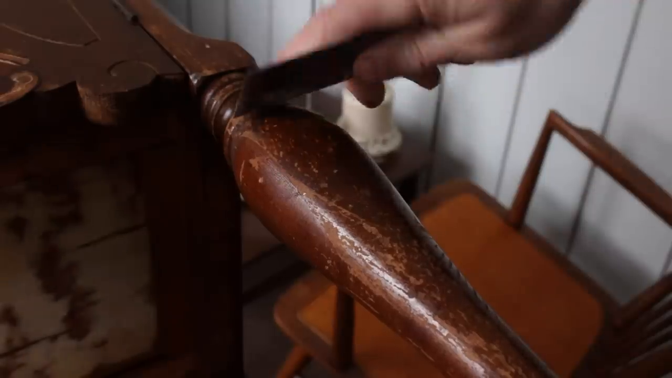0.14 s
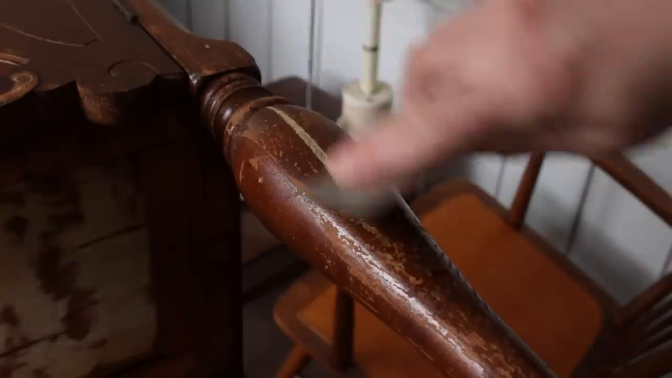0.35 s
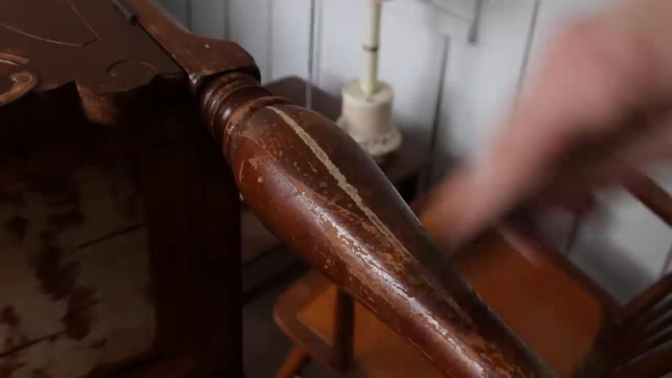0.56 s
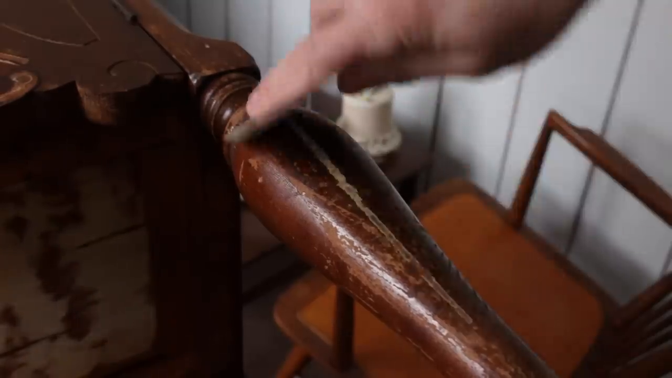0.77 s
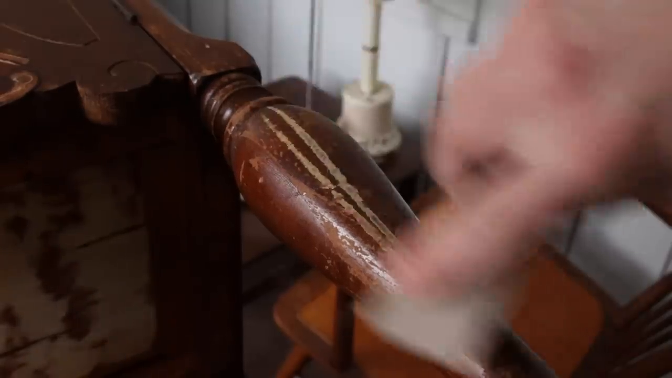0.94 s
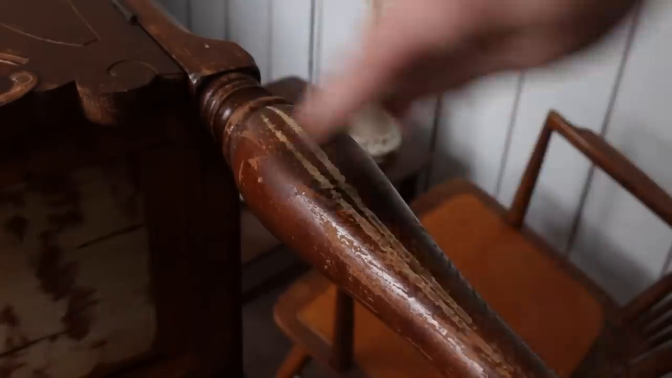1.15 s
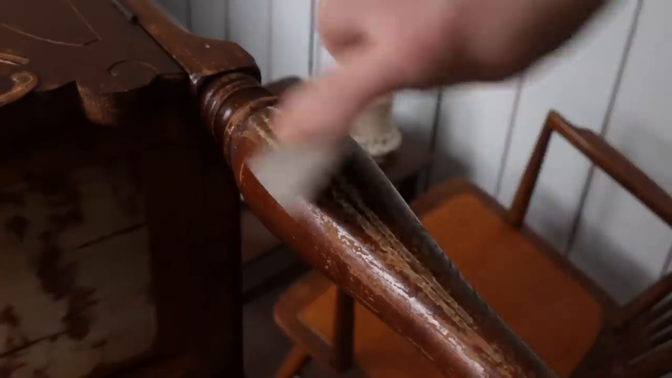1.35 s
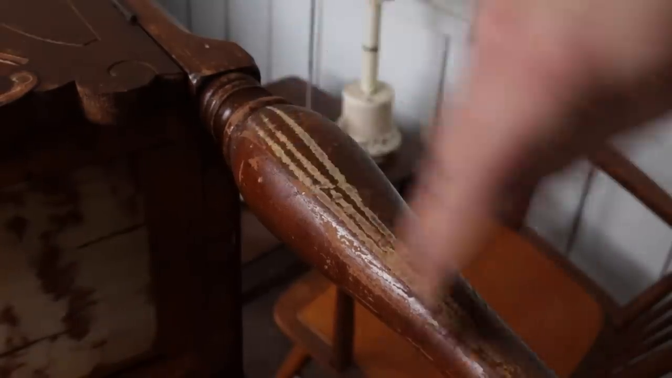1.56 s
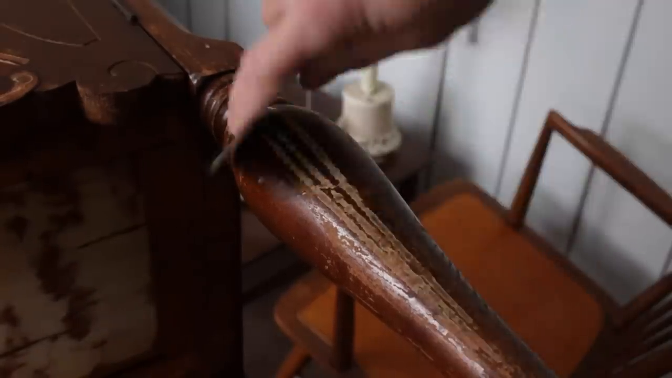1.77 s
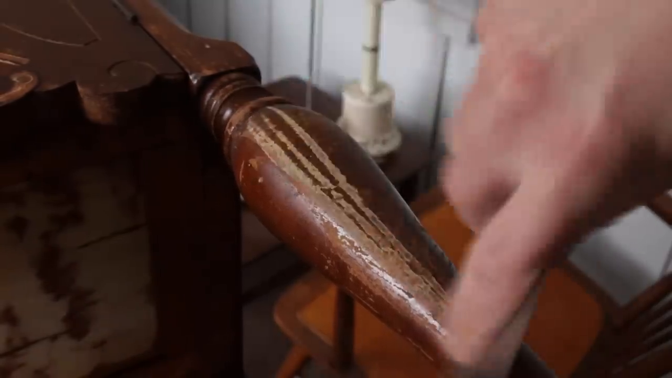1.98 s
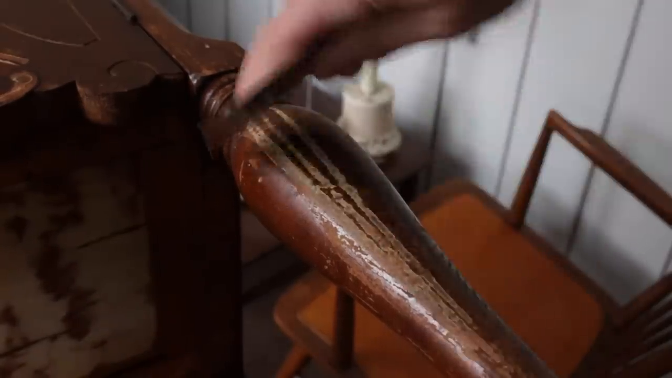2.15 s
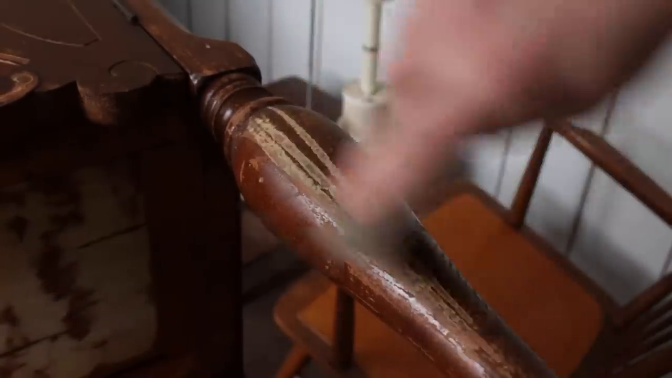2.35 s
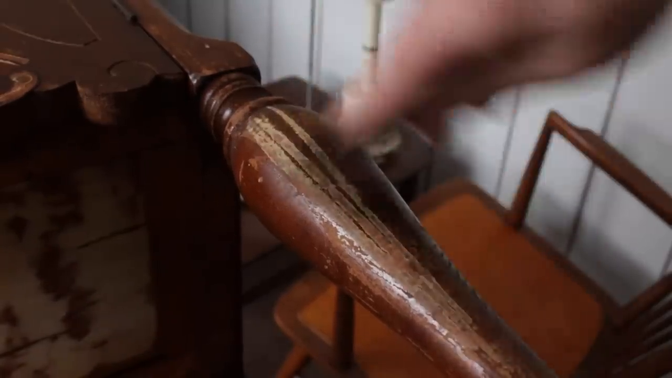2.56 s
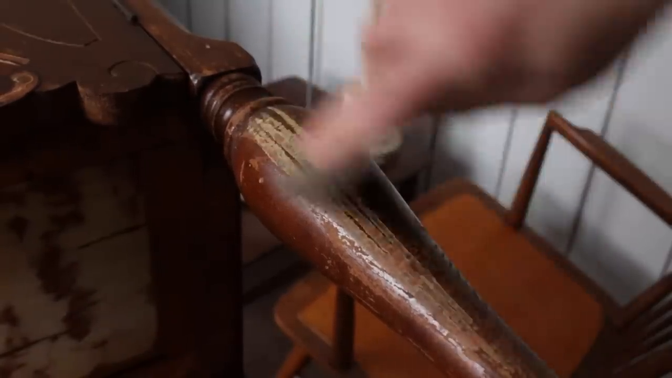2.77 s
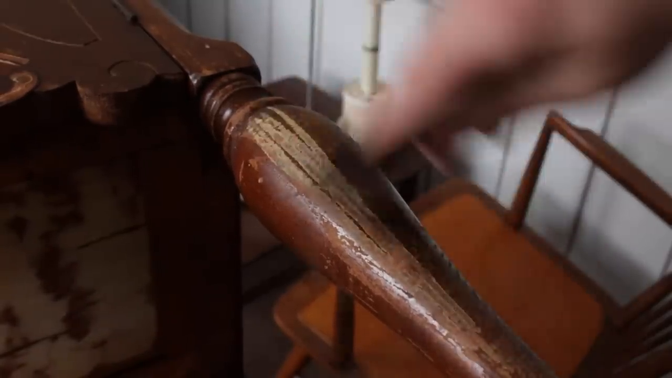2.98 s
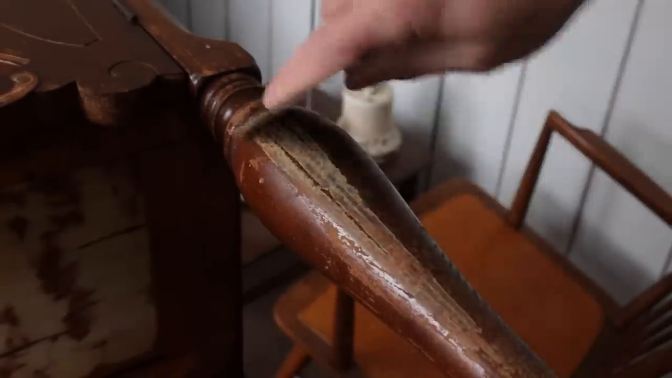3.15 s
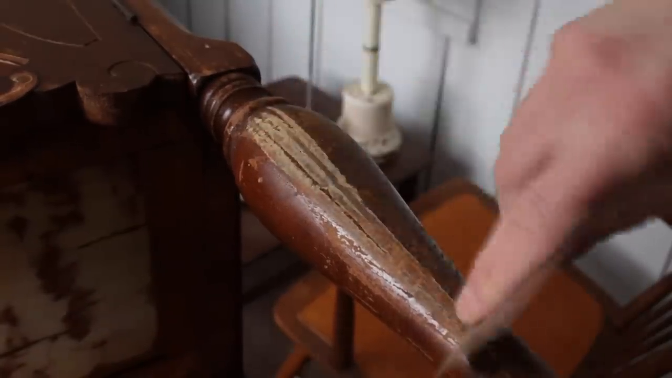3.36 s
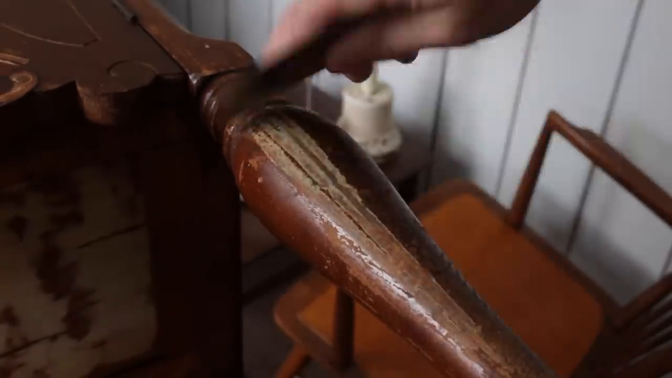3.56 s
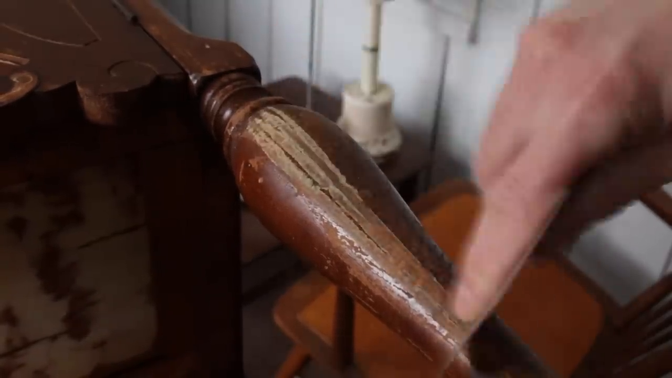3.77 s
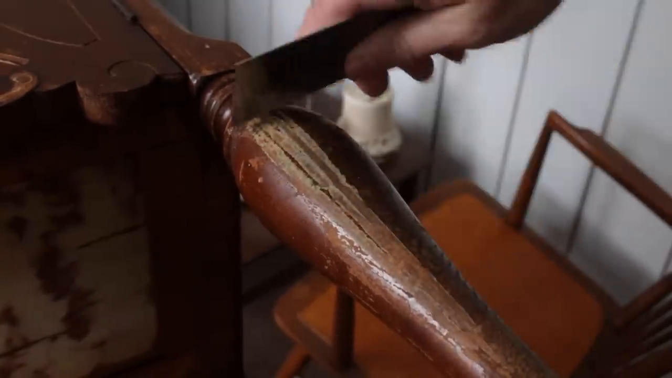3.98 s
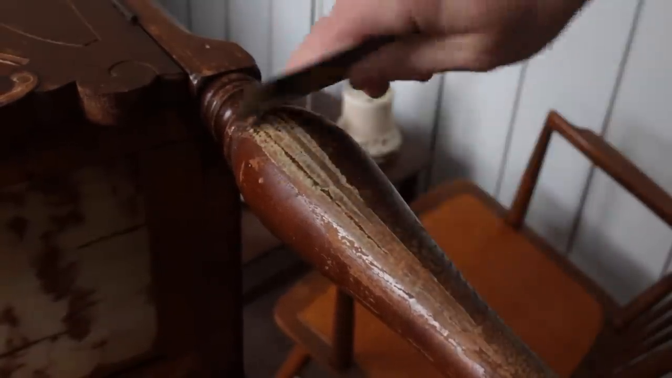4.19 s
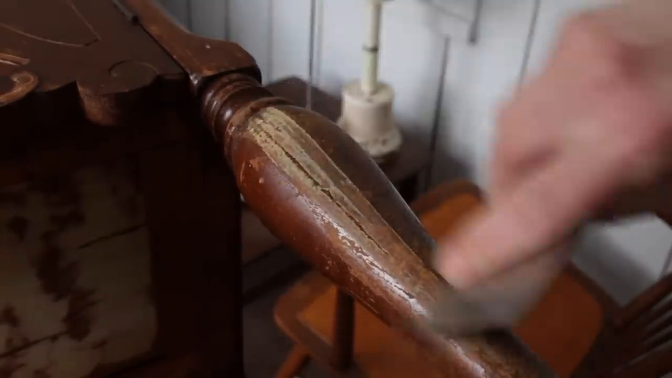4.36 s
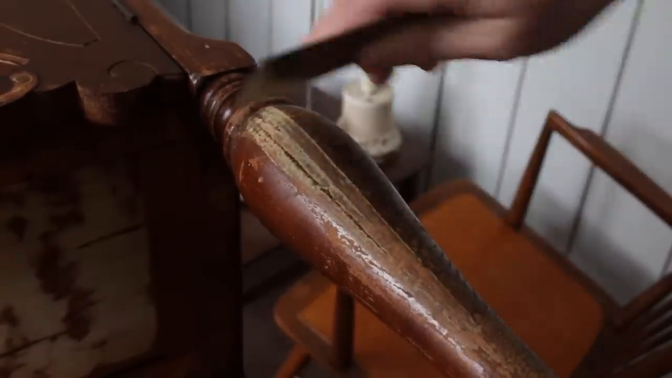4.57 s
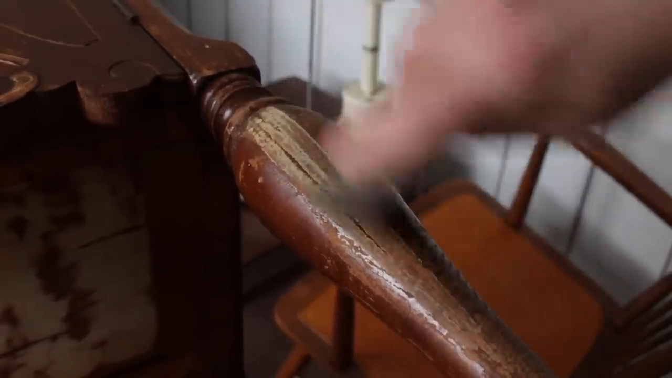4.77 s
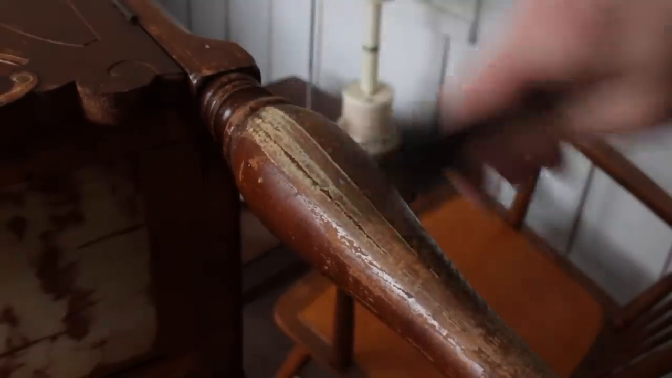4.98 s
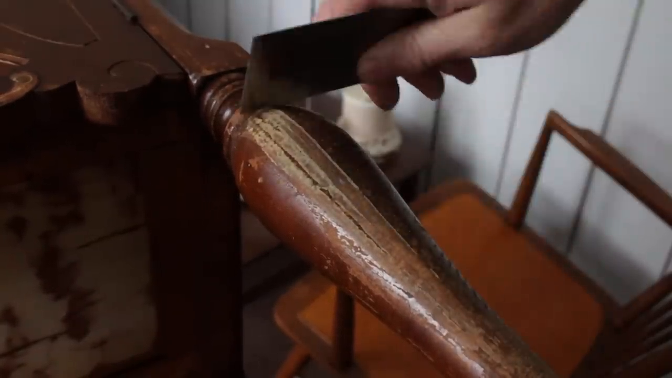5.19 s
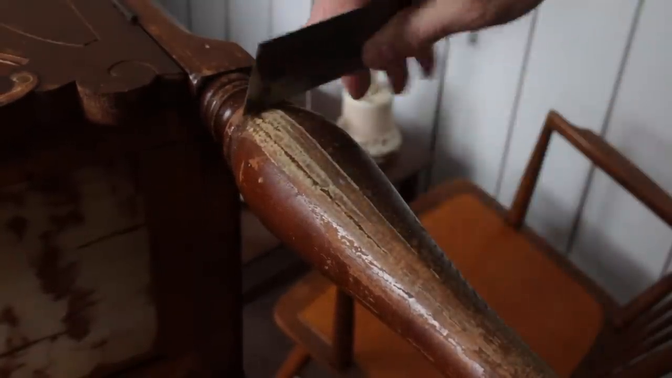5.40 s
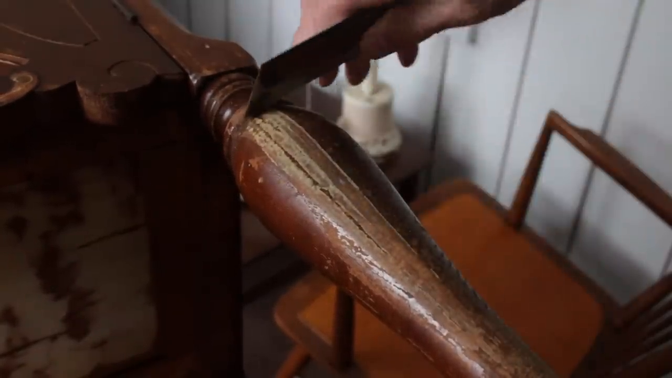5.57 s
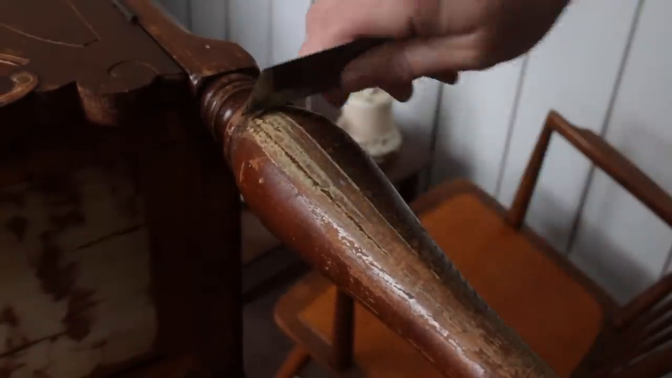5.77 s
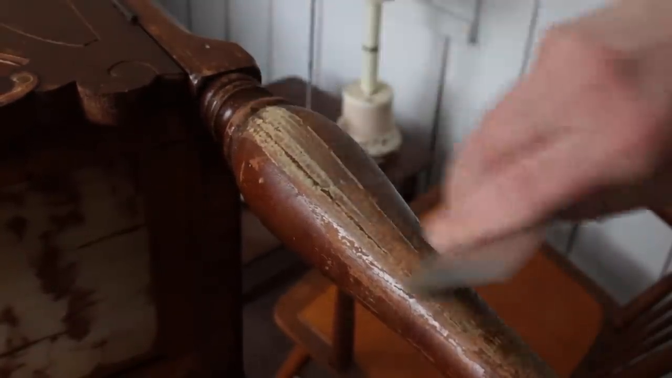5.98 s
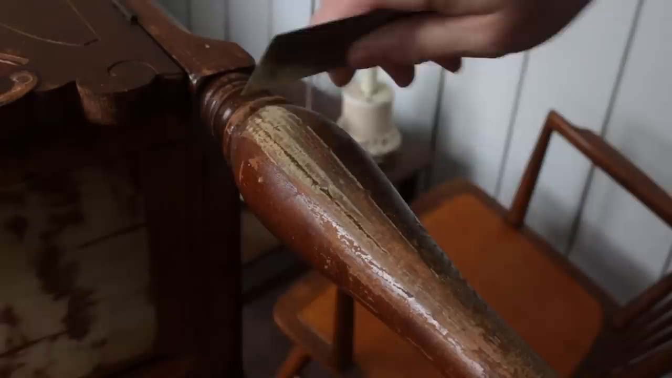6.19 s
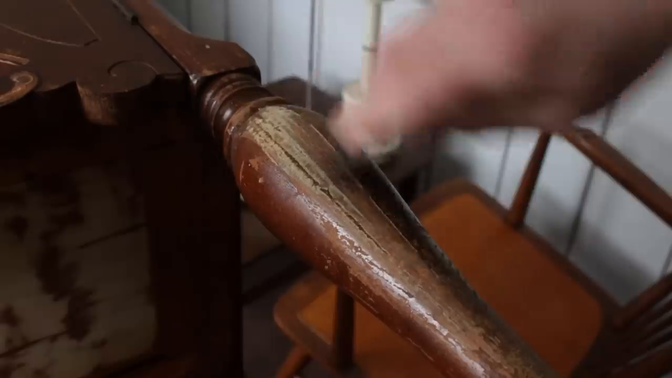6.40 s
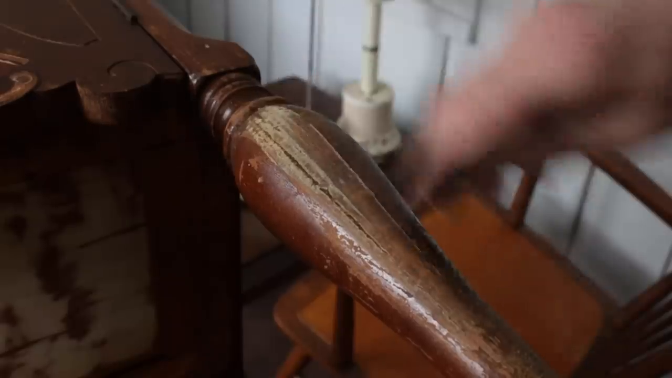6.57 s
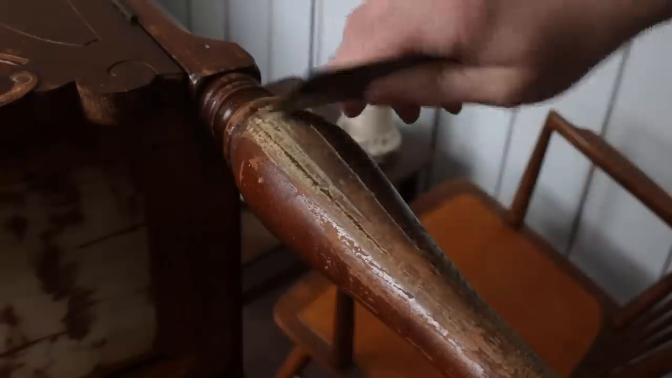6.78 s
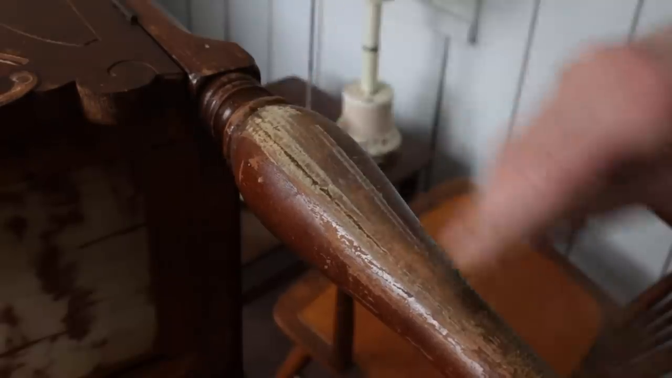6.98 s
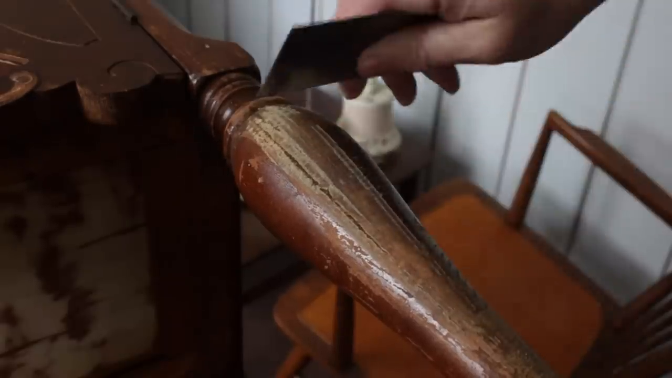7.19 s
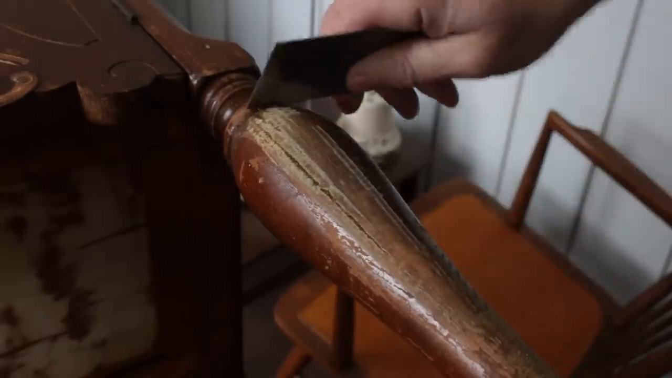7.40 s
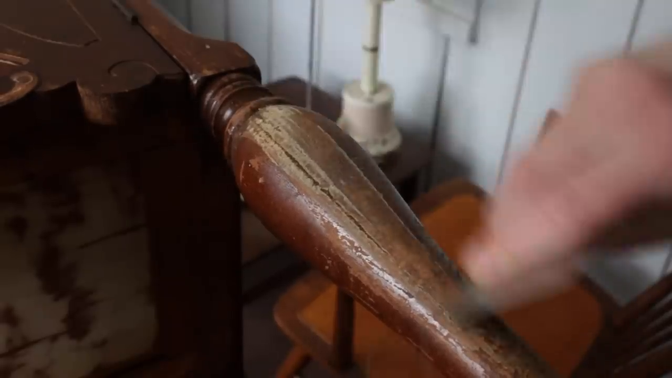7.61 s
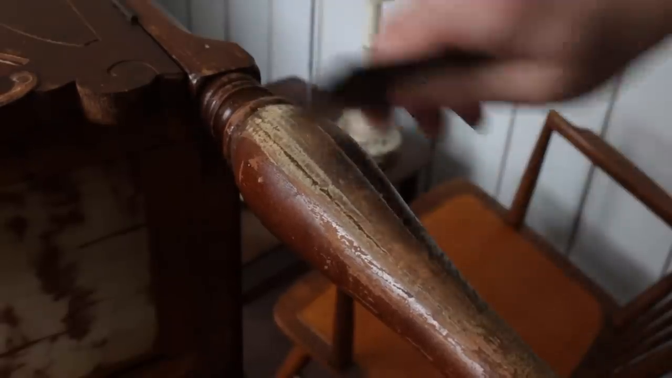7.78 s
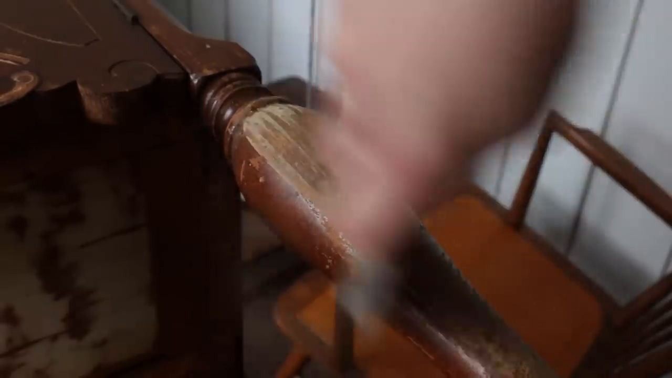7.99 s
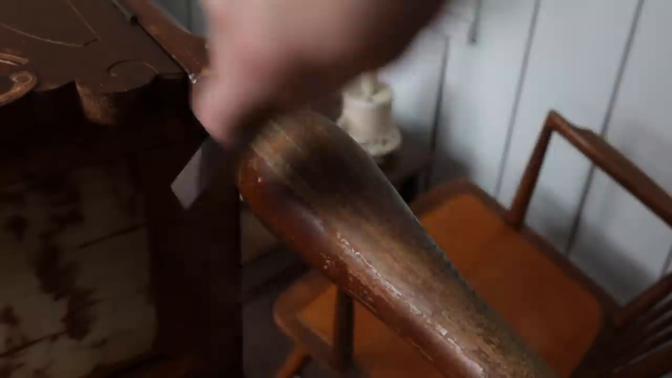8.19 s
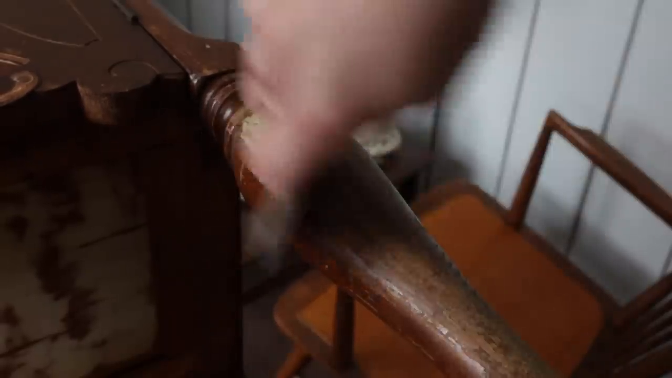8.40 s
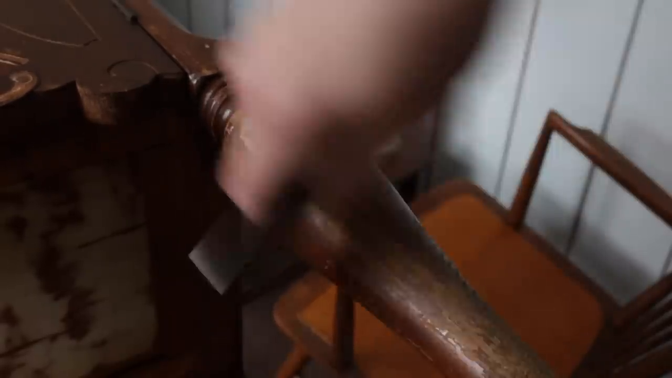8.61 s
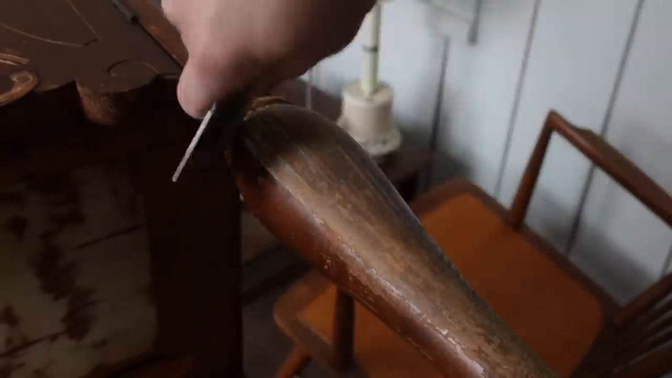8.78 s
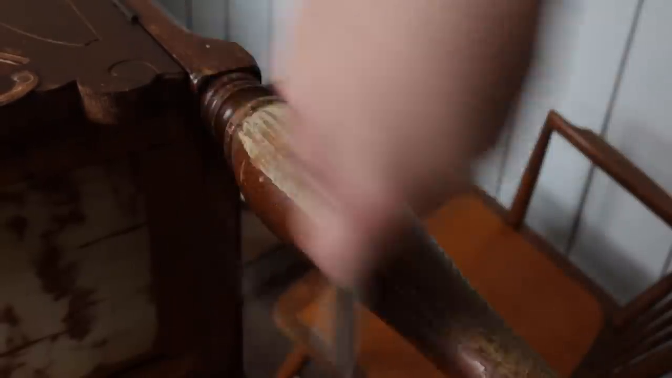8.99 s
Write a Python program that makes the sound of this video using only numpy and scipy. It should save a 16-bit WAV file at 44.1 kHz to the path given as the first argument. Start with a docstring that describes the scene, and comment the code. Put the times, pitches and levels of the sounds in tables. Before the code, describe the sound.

Close stereo microphones in a small, quiet workshop. A steel blade lands softly on a wooden furniture leg with a juddering skid, then pulls a gritty scrape. Tap and scrape repeat about twice a second, with sharper knocks and bright snaps of varnish. Dull furniture bumps join later; after a brief lull of faint grazes past five seconds, strokes resume and the last is still biting at the end.

```python
"""A small workshop, close pair of microphones, quiet air: a steel card scraper on a turned wooden furniture leg.
At once the blade is set down with a tap (a blow ringing leg and steel) and skids, a dying judder; a light graze follows.
Then stroke after stroke, all but one tapped in: fractures and friction tear brittle varnish, shaking leg and bent blade,
whose resonances shift with the grip; flakes snap off. Past 4 s dull bumps of the furniture join in; a pause past 5 s
holds faint grazes. The last pull is still biting at the end. Dense echoes and a banded tail are the room."""
import sys
import numpy as np
from scipy import signal
from scipy.fft import rfft, irfft, next_fast_len
from scipy.io import wavfile

SR = 44100
rng = np.random.default_rng(int(sys.argv[2]) if len(sys.argv) > 2 else 0)


def pcm_store(signal):
    """Save signal as 16-bit PCM."""
    levels = np.round(np.clip(np.atleast_2d(signal), -1, 1) * 32767)
    wavfile.write(sys.argv[1], SR, levels.astype(np.int16).T)


N = 399105
TIME = np.arange(N) / SR

# Quiet air of the place, and the upper band limit of the recorder
AIR_DB = -81
EDGE_HZ = 15900
# Spectrum of the air: [f/Hz, relative level per Hz/dB]
AIR_SPECTRUM = [(30, -28), (60, -13.5), (130, -2), (280, 5), (550, 1), (800, -19), (1100, -1.5), (2000, -7),
                (4000, -6.5), (8000, -14.5), (11800, -16.5), (13000, -53)]
# Reverberation of the workshop: [f/Hz, t60/s]
ROOM_DECAY = [(150, 0.51), (700, 0.59), (1700, 0.35), (4000, 0.27), (8000, 0.24), (15000, 0.13)]
# Spread between the microphones: [f/Hz, side re middle level/dB]
STEREO_WIDTH = [(120, -22.5), (300, -17), (600, -14.5), (1100, -10.5), (2200, -8), (4000, -6.5),
                (8000, -3.5), (13000, -1.5)]
# Balance of the pair: [f/Hz, left re right level/dB]
STEREO_LEAN = [(200, -0.5), (600, 2), (1000, 1.2), (2000, 1), (4000, 0), (12000, -1)]

# Dull bumps of the furniture: [t/s, level/dB]
BUMP_TIMES = [(4.312, -37), (7.857, -31), (8.158, -34.5), (8.61, -33.5), (8.94, -31)]
# Spectrum of a bump: [f/Hz, relative level per Hz/dB]
THUD_SPECTRUM = [(60, -10), (130, 1), (220, 8.5), (330, 14), (550, 0), (1200, -31), (4000, -60)]
# The edge grazes the leg between strokes: [t/s, length/s, level before the part trims/dB]
GRAZE_TIMES = [(0.224, 0.1, -57.5), (5.425, 0.13, -73.5), (5.53, 0.27, -77), (5.676, 0.3, -72.5),
               (7.427, 0.13, -77)]
# Larger flakes of varnish snapping off: [t/s, level/dB]
FLAKE_TIMES = [(.266, -40), (.924, -19), (.937, -18), (.963, -18), (1.44, -15), (1.907, -28), (1.92, -16.5),
               (2.348, -34), (2.924, -24), (4.355, -14), (6.859, -29), (7.545, -27), (7.889, -34)]

# Blade set down: [t/s, leg level/dB, blade level/dB, tick level/dB, skid length/s, skid re blow before trim/dB,
# most excited leg f/Hz, most excited blade f/Hz]
TAP_TIMES = [(0.001, -28, -32.5, -44, 0.17, -5, 680, 1540),
             (0.8607, -19, -20.5, -18.5, 0.039, -13, 726, 1670),
             (1.3456, -21.5, -20.5, -21, 0.08, -10.5, 814, 1950),
             (1.8447, -19, -23.5, -25, 0.045, -7, 716, 1830),
             (2.29, -15.5, -18, -24.5, 0.044, -9, 746, 2240),
             (2.753, -26.5, -24, -30.5, 0.075, -5.5, 703, 2080),
             (3.169, -23.5, -24.5, -25, 0.047, 3.5, 730, 1630),
             (3.678, -20.5, -20, -23, 0.13, -4, 696, 2280),
             (4.073, -15.5, -19.5, -22, 0.086, -3, 640, 1520),
             (4.723, -19.5, -20, -21.5, 0.12, -12, 714, 1760),
             (5.2501, -20, -22, -28, 0.11, 2.5, 712, 2270),
             (6.351, -24, -19.5, -24.5, 0.036, -33, 733, 2330),
             (6.8045, -25, -25.5, -29, 0.038, -8, 715, 2300.0),
             (7.34, -21, -18.5, -32, 0.028, -2.5, 700, 1570),
             (8.3692, -16, -18, -19.5, 0.067, -9, 830, 2030),
             (8.835, -20, -26.5, -26.5, 0.055, -2.5, 776, 1790)]
# Spectrum of the tick of a tap and the snap of a flake: [f/Hz, relative level per Hz/dB]
TICK_SPECTRUM = [(1000, -35.5), (2600, 1), (3300, 2.5), (4300, -0.5), (5500, -5.5), (8000, -11),
                 (11000, -14), (15800, -27.5)]
# The blade's own bright ring on landing, soon damped by the wood: [f/Hz, width/Hz, relative level/dB]
PING_MODES = [(2249, 74, 6.5), (2760, 140, -4)]
# Resonances of the leg and its frame: [f/Hz, width/Hz, relative level/dB]
LEG_MODES = [(154, 63, -30.5), (236.5, 15, -16), (354.6, 38, -11), (465, 72, -9.5), (520, 93, -6.5),
             (619, 42.5, -5), (702, 76.4, -0.5), (743.5, 69, -5.5), (857, 54, 0), (884, 400, -10),
             (1114, 55, -9)]
# Resonances of the unbent blade touching the wood: [f/Hz, width/Hz, relative level/dB]
BLADE_MODES = [(1590, 94, 5.5), (1798, 78, -1), (1996, 87, 0), (2297, 132, 5.5), (2700, 320, -4.5)]

# One row a pull: [t/s, time to full bite/s, hold/s, rasp level at full bite/dB, sag over the hold/dB,
# leg re rasp level/dB, blade re rasp level/dB, fizz re rasp level/dB,
# bent blade f/Hz, eased blade f/Hz, rasp f at the bite/Hz, sizzle of the edge f/Hz]
STROKE_TIMES = [ (0.3, 0.14, 0.13, -43, -3.5, -8, -3.5, -2, 1705, 1614, 3840, 6650),
                (0.872, 0.095, .14, -42.5, -4.5, -9, -5.5, -1.5, 1790, 1600, 3800, 9640),
                (1.407, 0.057, .13, -44.5, -2, -10, -2.5, 0.5, 1980, 1625, 3760, 8500),
                (1.883, 0.079, .13, -42.5, -5.5, -7, -4, 2, 1730, 1670, 3690, 10100),
                (2.334, 0.09, .13, -43.5, -7, -5, -5.5, .5, 1760, 1600, 3830, 7300),
                (2.791, 0.069, .13, -41, -7, -8.5, -6, 0, 1630, 1640, 3280, 6560),
                (3.248, .085, .092, -44, -8, -4.5, -6.5, -0.5, 1800, 1650, 3370, 6800),
                (3.705, .11, 0.058, -45, -3.5, -9.5, -4, 0, 1760, 1640, 3400, 9900),
                (4.264, .076, .14, -47, -5.5, -4.5, -5.5, 0.5, 1760, 1640, 3570, 5400),
                (4.81, 0.078, .1, -43, -6, -9.5, -6, -1.5, 1680, 1684, 3570, 10200),
                (5.86, 0.14, 0.067, -42.5, -6.5, -7, -7, 1.5, 1735, 1840, 3450, 5470),
                (6.429, 0.083, 0.068, -41, -5, -10.5, -8.5, -1, 1830, 1676, 3460, 8800),
                (6.842, .11, 0.081, -41.5, -7, -10, -7.5, -0.5, 1850, 1640, 3450, 5300),
                (7.515, 0.13, 0.065, -43, -4, -8.5, -3, 1.5, 1960, 1950, 3820, 7700),
                (7.891, 0.11, 0.17, -44.5, -3.5, -8.5, -7, -2.5, 1650, 1680, 3770, 6600),
                (8.421, 0.082, 0.13, -43.5, -5, -7, -7.5, -4, 1780, 1640, 3640, 8900),
                (8.952, 0.13, .06, -42, -7, -9, -7.5, -4.5, 1820, 2080, 4020, 8800)]
# The edge skips (negative) or digs in (positive): [centre t/s, length/s, level/dB]
CATCH_TIMES = [(0.526, 0.11, -3), (0.59, 0.076, 7), (0.986, 0.078, -0.5), (1.521, 0.071, -5),
               (2.946, 0.067, -7.5), (2.994, 0.022, 5), (4.408, 0.075, 7.5), (5.968, 0.079, -3),
               (6.914, 0.035, -11.5), (7.613, 0.05, -9.5), (7.977, 0.073, -4), (8.013, 0.069, 6),
               (8.517, 0.024, 5)]
# Spectra of the rasp and of the fizz of the varnish: [f/Hz, relative level per Hz/dB]
RASP_SPECTRUM = [(1500, -47.5), (2200, 3), (2800, 4), (4200, 7.5), (4900, -0.5), (5600, 0), (7500, -28)]
FIZZ_SPECTRUM = [(3500, -35.5), (5000, -6.5), (5700, -2), (7200, 0.5), (8000, -0.5), (9000, -1.5),
                 (10300, -1), (11500, -5.5), (13500, -8.5), (15800, -8.5)]
# How each part follows the hand: [level at first touch/dB, share of the sag, fall after letting up/(dB/s)]
RASP_PRESSURE = (-28.5, 0.85, 370)
LEG_PRESSURE = (-9.5, 1.48, 182)
BLADE_PRESSURE = (-19, 0.36, 285)
FIZZ_PRESSURE = (-29, 1.26, 540)
# Pressure builds fast, then levels off; after the bite it settles in the same way
BITE_CURVE, SETTLE_CURVE = 2, 1.97
# The edge meets the wood; the hand lets up; the edge leaves
TOUCH_S, RELEASE_S, LIFT_S = 0.0085, 0.115, 0.0067
# After the bite the blade relaxes to its eased resonance, and the rasp drops in pitch during the hold
UNBEND_S, RASP_SAG_HZ_PER_S = 0.042, 2700
# Lightly held blade: width of its ring, and its power share of blade and rasp bands at the end of a stroke
FREE_WIDTH_HZ, FREE_BLADE, FREE_RASP = 200, 0.75, 0.4


def amp(db):
    """Decibels to gain."""
    return 10 ** (np.asarray(db) / 20)


def evened(x):
    """Scales to rms 1."""
    return x / np.sqrt(np.mean(x ** 2) + 1e-20)


def read(points, hz):
    """Reads a table on a log-frequency axis."""
    f, value = np.transpose(points)
    return np.interp(np.log(hz + 1), np.log(f + 1), value)


def add(mix, s, sound):
    """Lays a sound into the mix at time s."""
    part = mix[max(round(s * SR), 0):][:len(sound)]
    part += sound[:len(part)]


def through(x, response):
    """Plays x through an impulse response of energy 1."""
    return signal.oaconvolve(x, response / np.linalg.norm(response))[:N]


def colour(x, spectrum, size=4096):
    """Causal minimum-phase filter with the shape of the given spectrum."""
    log_gain = np.log(amp(read(spectrum, abs(np.fft.fftfreq(size, 1 / SR)))))
    minimum_phase = np.exp(np.conj(signal.hilbert(log_gain)))
    return through(x, np.fft.ifft(minimum_phase).real[:size // 2])


def ring(x, modes, size=4096):
    """Damped modes; neighbours swing in opposite directions."""
    t = np.arange(size) / SR
    response = np.zeros(size)
    for k, (hz, width, db) in enumerate(modes):
        decay = np.exp(-np.pi * width * t)
        response += (-1) ** k * amp(db) * width * decay * np.sin(2 * np.pi * hz * t)
    return through(x, response)


def resonate(x, hz, width):
    """A steep resonance that follows the curve hz: shift down, low-pass twice, shift back; rms 1."""
    angle = 2 * np.pi * np.cumsum(hz) / SR
    angle = (angle % (2 * np.pi)).astype(np.float32)
    pole = np.exp(-np.pi * width / SR)
    turn = np.array([np.cos(angle), np.sin(angle)])
    slow = signal.lfilter([1], np.poly([pole, pole]), x * turn)
    return evened((turn * slow).sum(0))


def wander(rate):
    """Smooth chance of rms 1, low-passed at rate Hz."""
    lowpass = signal.butter(2, rate, fs=SR, output="sos")
    return evened(signal.sosfilt(lowpass, rng.standard_normal(N)))


def grit(per_s, spread_db, crackle):
    """Tiny fractures of very uneven size over smooth friction; crackle is their share of the power."""
    size = amp(spread_db * np.minimum(rng.exponential(1, N), 5)) * rng.choice([-1, 1], N)
    cracks = size * (rng.random(N) < per_s / SR)
    share = np.clip(crackle, 0, 1)
    return np.sqrt(share) * evened(cracks) + np.sqrt(1 - share) * rng.standard_normal(N)


def blows(rows):
    """One impulse for each row of time and level."""
    out = np.zeros(N)
    for s, db in rows:
        add(out, s, amp([db]))
    return out


def crumble(x, fade_s, size=4096):
    """Spreads each impulse into a short ragged burst."""
    age = np.arange(size) / SR
    return through(x, rng.standard_normal(size) * np.exp(-age / abs(fade_s)))


def favoured(modes, centre_hz, fall_db):
    """The point of contact excites the modes near one frequency most; fall_db is per octave."""
    return [(hz, w, db - fall_db * abs(np.log2(hz / centre_hz))) for hz, w, db in modes]


def quiet_air():
    """Steady coloured noise, the still air of the place."""
    return amp(AIR_DB) * colour(rng.standard_normal(N), AIR_SPECTRUM)


def reflections(early_t60=0.057, early_db=-2, late_db=-3.0, gap_s=0.0015, build_s=0.0086, size=24000):
    """Quick echoes off the furniture, then the tail of the room, each band dying at its own speed."""
    age = np.arange(size) / SR
    hz, t, bands = signal.stft(rng.standard_normal(size), SR, nperseg=256)
    t60 = read(ROOM_DECAY, hz)[:, None]
    late = signal.istft(bands * amp(-60 * t / t60) / np.sqrt(t60), SR, nperseg=256)[1][:size]
    late *= 1 - np.exp(-age / build_s)
    early = rng.standard_normal(size) * (rng.random(size) < 0.08) * (age > gap_s)
    early *= np.exp(-np.log(1000) * age / early_t60)
    return amp(early_db) * early / np.linalg.norm(early) + amp(late_db) * late / np.linalg.norm(late)


def workshop(x, changes_per_s=12, count=4):
    """Direct sound and echoes in the middle, other echoes at the sides; sets of echo paths crossfade in turn."""
    middle, side = np.zeros((2, N))
    for k in range(count):
        away = abs((TIME * changes_per_s - k + count / 2) % count - count / 2)
        part = x * np.cos(np.pi / 2 * np.minimum(away, 1))
        middle += signal.oaconvolve(part, reflections())[:N]
        side += signal.oaconvolve(part, reflections())[:N]
    return np.std(x) * evened(x + middle), np.std(x) * evened(side)


def bumping():
    """Dull bumps of the furniture: ragged bursts with a low spectrum."""
    return colour(crumble(blows(BUMP_TIMES), fade_s=0.031), THUD_SPECTRUM)


def grazing(blade_db=-2, fizz_db=-6, leg_db=-4):
    """The edge slides over the wood with hardly any pressure, barely shaking the leg."""
    touch = np.zeros(N)
    for s, length, db in GRAZE_TIMES:
        add(touch, s, amp(db) * signal.windows.tukey(max(int(length * SR), 2), 0.8))
    rub = touch * rng.standard_normal(N)
    blade = amp(blade_db) * ring(rub, favoured(BLADE_MODES, 1500, 7.5))
    fizz = amp(fizz_db) * colour(rub, FIZZ_SPECTRUM)
    return blade + fizz + amp(leg_db) * ring(rub, LEG_MODES)


def flaking(fizz_db=-4):
    """Larger flakes break away with a bright snap."""
    snaps = crumble(blows(FLAKE_TIMES), fade_s=0.0014)
    return colour(snaps, TICK_SPECTRUM) + amp(fizz_db) * colour(snaps, FIZZ_SPECTRUM)


def tapping(skid_db=2, skid_tick_db=-3, leg_db=0, blade_db=0, tick_db=0, leg_fall_db=4, blade_fall_db=12,
            pressed_hz=1650, dulling=0.2, ping_db=-1):
    """One sharp blow, then a dying judder as the edge skids into place."""
    out = np.zeros(N)
    judder = grit(per_s=700, spread_db=2, crackle=0.8)
    # the wood damps the pressed blade, so its resonances widen
    pressed = [(hz, 2 * w, db) for hz, w, db in favoured(BLADE_MODES, pressed_hz, blade_fall_db)]
    for s, leg, blade, tick, length, drag_db, leg_hz, blade_hz in TAP_TIMES:
        count = max(int(length * SR), 2)
        skid = judder[max(round(s * SR), 0):][:count] * np.sqrt(np.linspace(1, 0, count))
        skid = amp(drag_db + skid_db) * skid / np.linalg.norm(skid)
        # a stronger skid leaves less energy for the blow
        blow = signal.unit_impulse(count) / np.sqrt(1 + np.sum(skid ** 2))
        # the held blade and the leg swing together in one extra mode
        knock = favoured(LEG_MODES, leg_hz, leg_fall_db) + [(leg_hz, 90, 4)]
        steel = ring(blow, favoured(BLADE_MODES, blade_hz, blade_fall_db))
        steel = steel + ring(skid, pressed) + amp(ping_db) * ring(blow, PING_MODES)
        add(out, s, amp(leg + leg_db) * ring(blow + skid, knock))
        add(out, s, amp(blade + blade_db) * steel)
        # a flat landing ticks little, and its tick is duller
        tilt = dulling * (tick - blade)
        snap = [(hz, db + tilt * np.log2(max(hz / 3500, 1))) for hz, db in TICK_SPECTRUM]
        add(out, s, amp(tick + tick_db) * colour(blow + amp(skid_tick_db) * skid, snap))
    return out


def pulling():
    """The hand presses in, holds, lets up: gains of rasp, leg, blade and fizz, three pitches, progress 0-1."""
    gains, pitches, progress = np.zeros((4, N)), np.full((3, N), 1000.), np.zeros(N)
    follows = [RASP_PRESSURE, LEG_PRESSURE, BLADE_PRESSURE, FIZZ_PRESSURE]
    for (start, bite, hold, peak_db, sag_db, leg_db, blade_db, fizz_db,
         bent_hz, eased_hz, rasp_hz, sizzle_hz) in STROKE_TIMES:
        length = bite + hold + RELEASE_S
        span = slice(max(round(start * SR), 0), round((start + length + LIFT_S) * SR))
        t = TIME[span] - start
        slack = np.clip(1 - t / bite, 0, 1) ** BITE_CURVE
        settled = 1 - np.clip(1 - (t - bite) / hold, 0, 1) ** SETTLE_CURVE
        released_s = np.maximum(t - bite - hold, 0)
        contact = np.interp(t, [0, TOUCH_S, length, length + LIFT_S], [0, 1, 1, 0])
        offsets_db = [0, leg_db, blade_db, fizz_db]
        for k, (db, (touch_db, share, fall)) in enumerate(zip(offsets_db, follows)):
            pressure_db = touch_db * slack + share * sag_db * settled - fall * released_s
            gains[k, span] = contact * amp(peak_db + db + pressure_db)
        pitches[0, span] = np.interp(t, [bite, bite + UNBEND_S], [bent_hz, eased_hz])
        pitches[1, span] = rasp_hz - RASP_SAG_HZ_PER_S * np.clip(t - bite, 0, hold)
        pitches[2, span] = sizzle_hz
        progress[span] = np.clip(t / length, 0, 1)
    return gains, pitches, progress


def catching():
    """Gain of the brief skips and digs of the edge."""
    db = np.zeros(N)
    for s, length, depth_db in CATCH_TIMES:
        add(db, s - length / 2, depth_db * np.hanning(max(int(length * SR), 2)))
    return amp(db)


def scraping(blade_width=560, rasp_width=850, rasp_focus=0.49, sizzle_width=1400, sizzle_db=-9,
             leg_db=0, blade_db=0, rasp_db=0, fizz_db=0):
    """The edge catches and slips through the varnish, shaking leg and blade; widths in Hz."""
    (rasp_gain, leg_gain, blade_gain, fizz_gain), (blade_hz, rasp_hz, edge_hz), progress = pulling()
    chatter = evened(amp(2.4 * wander(120) + 0.7 * wander(30)))
    tear = evened(grit(per_s=3000, spread_db=4.0, crackle=0.6) * chatter)
    rub, whisper = rng.standard_normal((2, N)) * chatter
    # towards the end of a stroke the pressure eases: the blade rings more freely, its resonances narrow
    free = FREE_BLADE * progress
    bend = np.sqrt(1 - free) * resonate(tear, blade_hz, blade_width)
    bend += np.sqrt(free) * resonate(rub, blade_hz, FREE_WIDTH_HZ)
    free = FREE_RASP * progress ** 2
    rasp = evened(colour(tear, RASP_SPECTRUM) + rasp_focus * resonate(rub, rasp_hz, rasp_width))
    rasp = np.sqrt(1 - free) * rasp + np.sqrt(free) * resonate(whisper, rasp_hz, 2 * FREE_WIDTH_HZ)
    # the edge adds one high note for each stroke to the fizz of the varnish
    sizzle = amp(sizzle_db) * resonate(whisper, edge_hz, sizzle_width)
    fizz = evened(colour(tear, FIZZ_SPECTRUM) + sizzle)
    # the wooden note of the grip glides from tap to tap, a little stiffer under load
    grip_hz = np.interp(TIME, [tap[0] for tap in TAP_TIMES], [tap[6] for tap in TAP_TIMES])
    wood = evened(ring(tear, LEG_MODES) + 0.62 * resonate(rub, 1.078 * grip_hz, width=178))
    edge = amp(blade_db) * blade_gain * bend + amp(rasp_db) * rasp_gain * rasp
    edge += amp(fizz_db) * fizz_gain * fizz
    return amp(leg_db) * leg_gain * wood + catching() * edge


def scene(lowcut_hz=150):
    """All sources in the room, over quiet air, at a close pair of microphones."""
    work = bumping() + grazing() + flaking() + tapping() + scraping()
    # the deep bass of all sources is cut away
    work = signal.sosfilt(signal.butter(4, lowcut_hz, "high", fs=SR, output="sos"), work)
    middle, side = workshop(work)
    size = next_fast_len(N + 4096, True)
    hz = np.fft.rfftfreq(size, 1 / SR)
    middle = rfft(middle + quiet_air(), size)
    side = rfft(side + quiet_air(), size) * amp(read(STEREO_WIDTH, hz))
    lean = amp(read(STEREO_LEAN, hz) / 2)
    return irfft(np.array([(middle + side) * lean, (middle - side) / lean]), size)[:, :N]


def record(dry):
    """The recorder's band limit, a steep low-pass."""
    lowpass = signal.firwin(511, EDGE_HZ, window=("kaiser", 9), fs=SR)
    return signal.oaconvolve(dry, lowpass[None], "same")


dry = scene()
out = record(dry)
pcm_store(out)
```